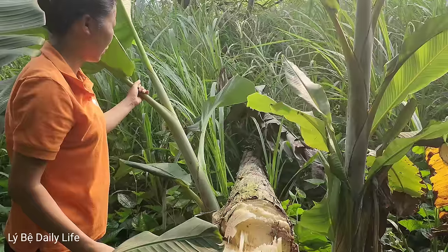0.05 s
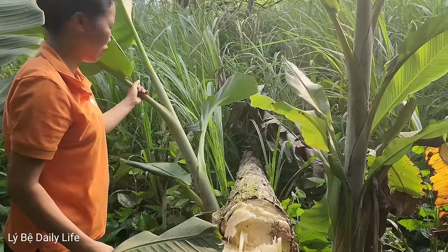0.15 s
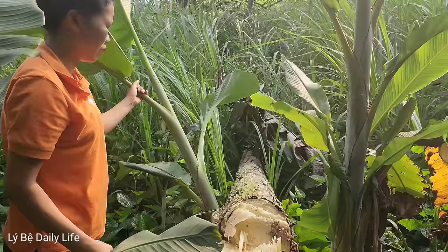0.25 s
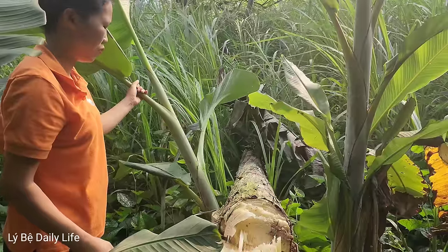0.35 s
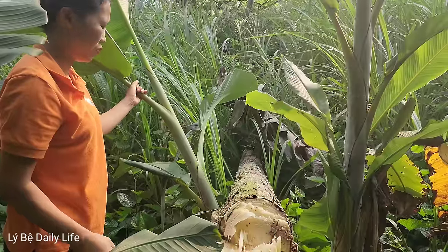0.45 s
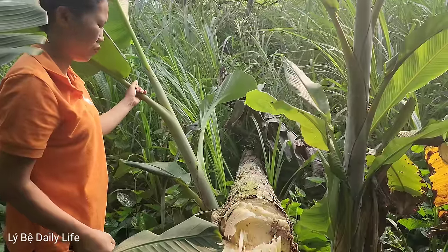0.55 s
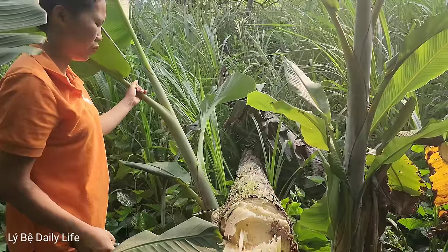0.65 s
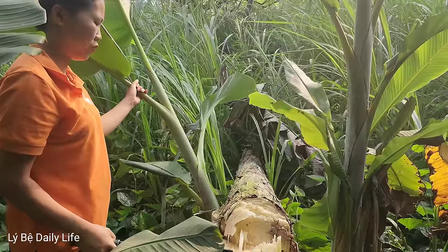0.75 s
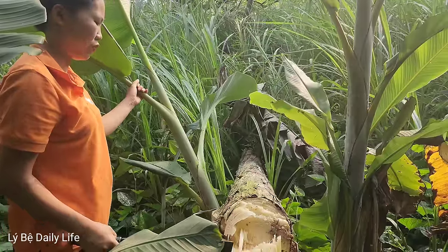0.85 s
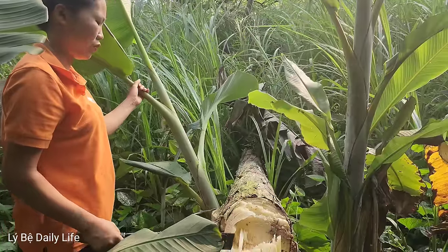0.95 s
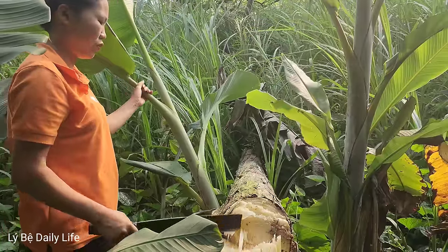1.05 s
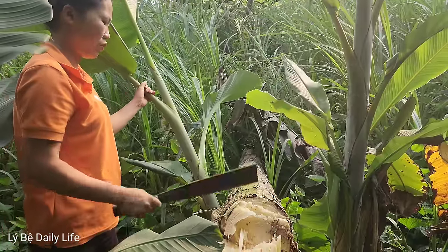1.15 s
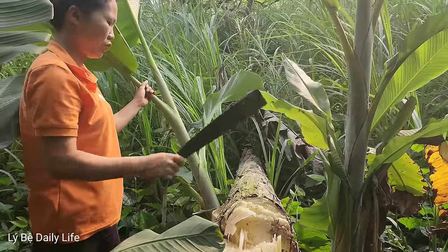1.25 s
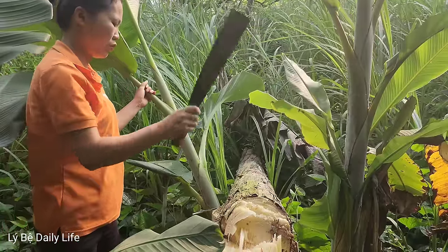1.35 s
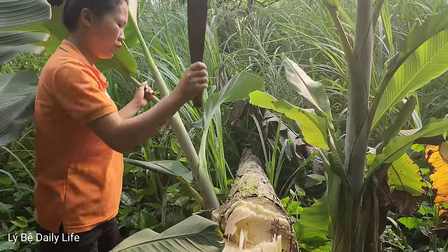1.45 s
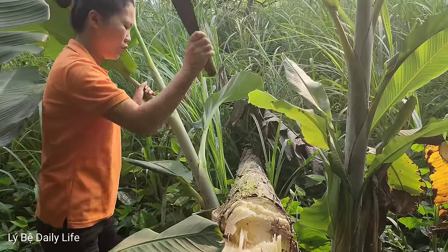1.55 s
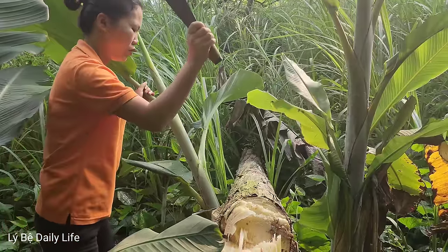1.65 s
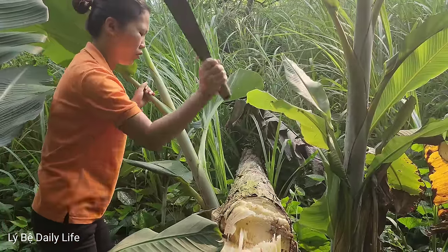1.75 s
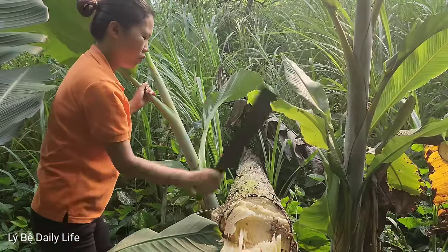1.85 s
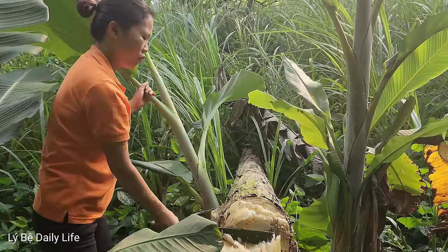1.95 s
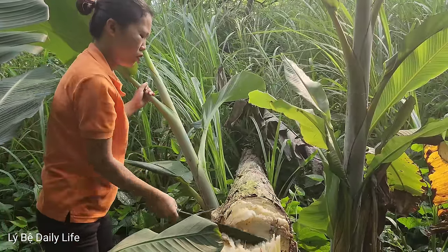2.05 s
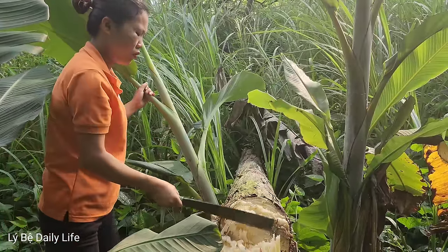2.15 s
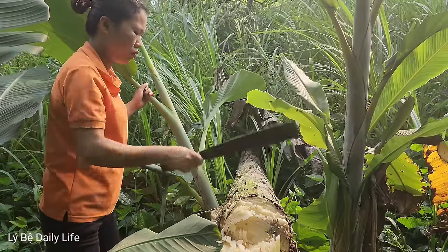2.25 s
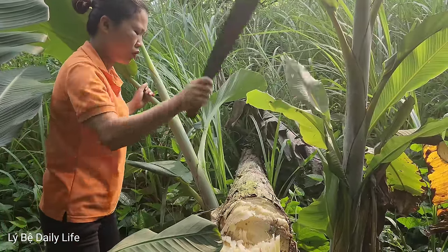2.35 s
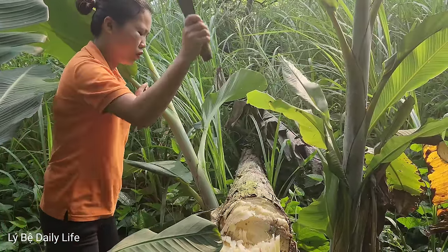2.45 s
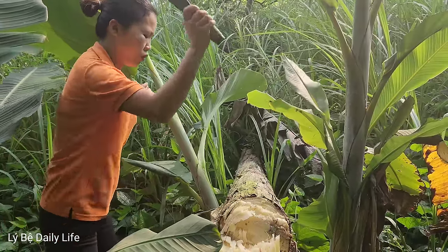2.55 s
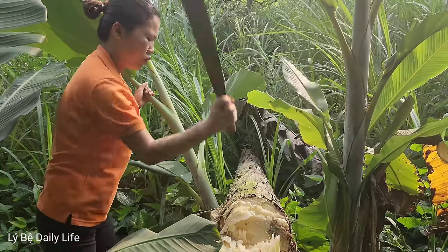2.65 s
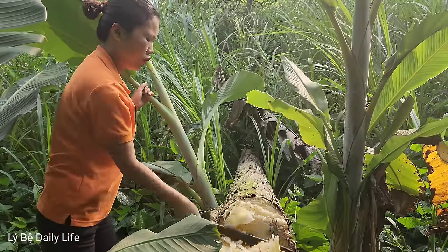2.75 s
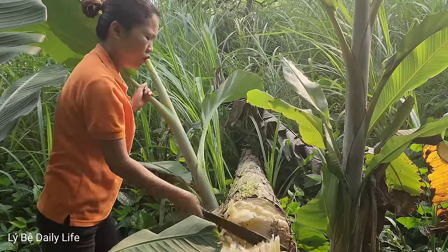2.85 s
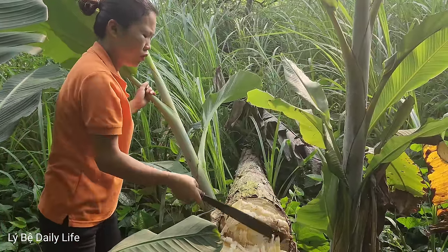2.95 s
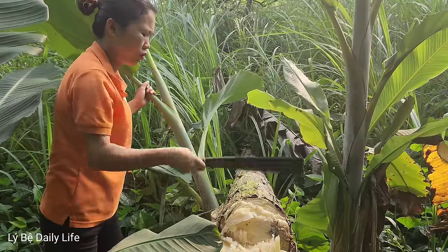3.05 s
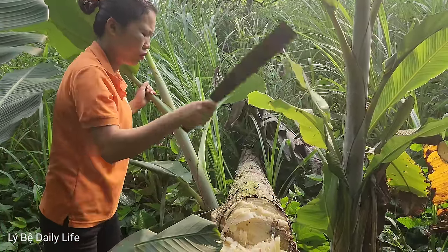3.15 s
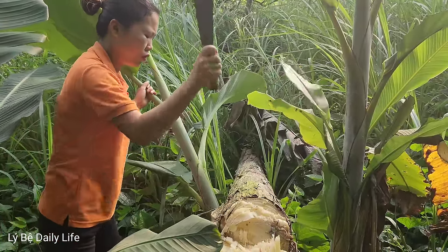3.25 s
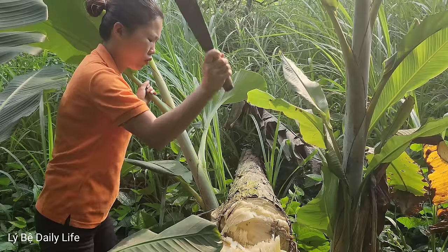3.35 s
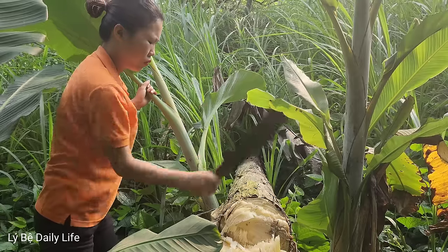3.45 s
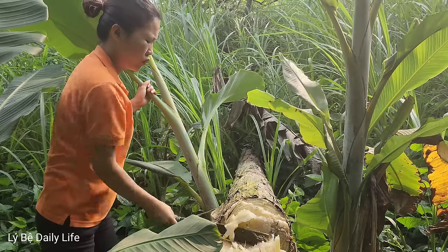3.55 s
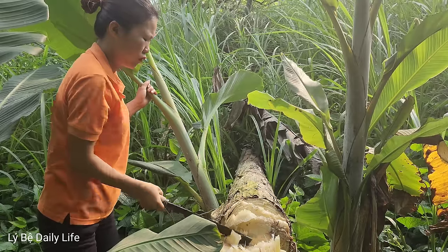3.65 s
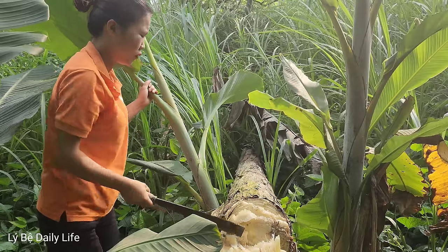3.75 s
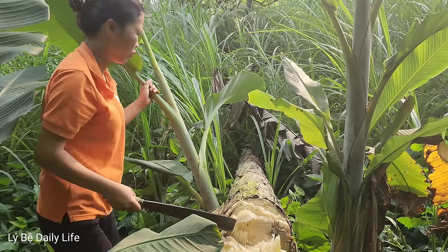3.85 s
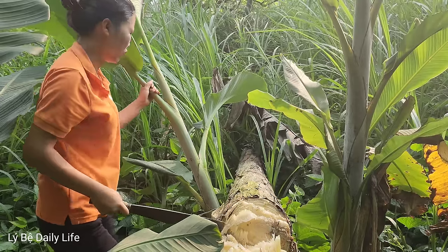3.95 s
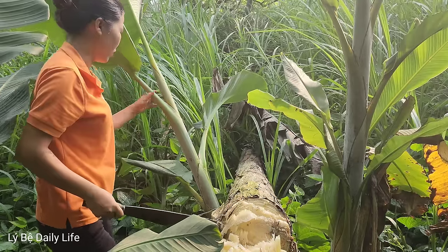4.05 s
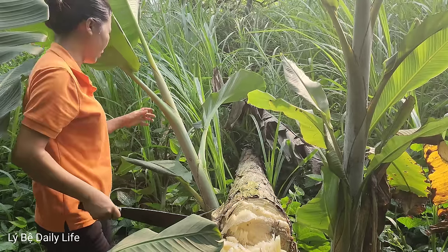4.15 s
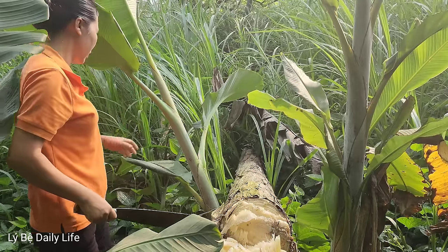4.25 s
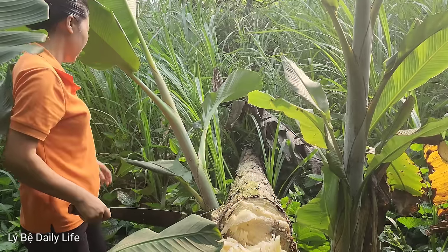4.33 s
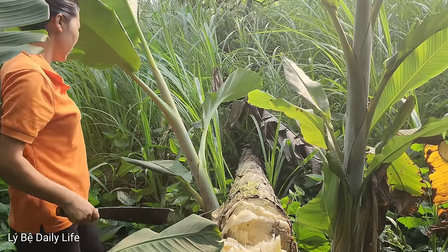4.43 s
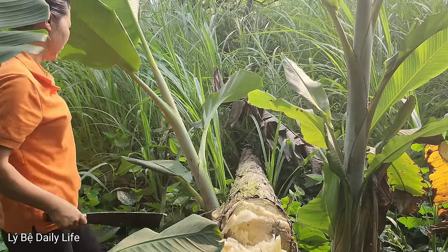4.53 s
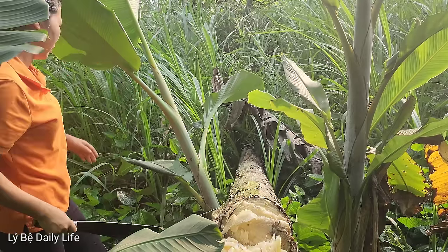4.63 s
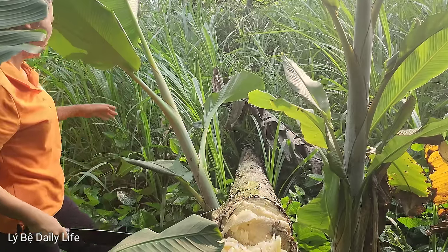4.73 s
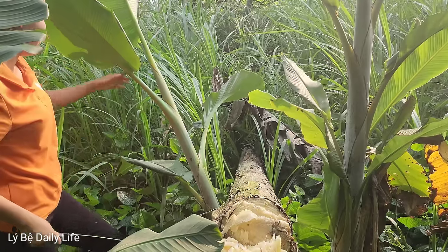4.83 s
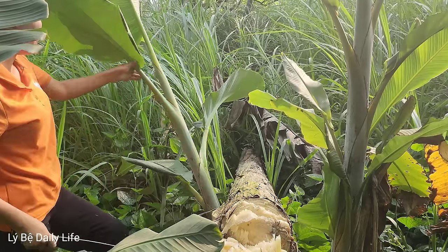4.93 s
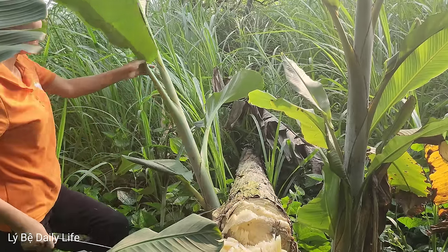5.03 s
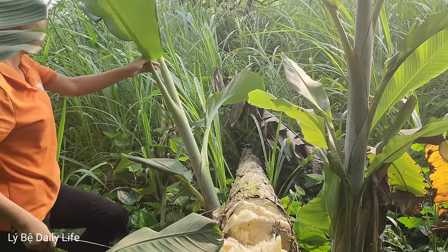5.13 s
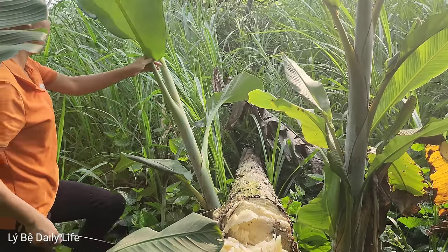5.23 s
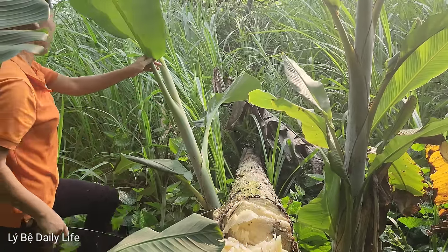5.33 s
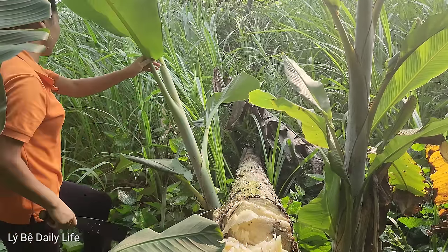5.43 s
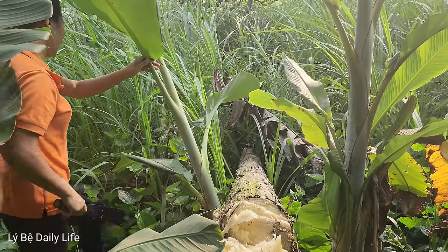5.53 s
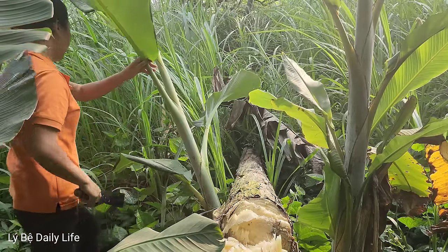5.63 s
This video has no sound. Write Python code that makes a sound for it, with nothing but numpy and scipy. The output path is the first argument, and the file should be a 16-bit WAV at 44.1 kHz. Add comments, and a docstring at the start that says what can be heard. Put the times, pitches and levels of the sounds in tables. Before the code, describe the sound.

Leaves rustle in an open garden while a bird repeats one high, arched whistle and insects whine faintly. Close to the stereo microphones, a machete chops three times into a felled banana trunk, each blow a wet, tearing crunch with a hollow thud, and is tugged free in between. Then soft footsteps move through the undergrowth, a little to the left.

```python
"""Leaves rustle in an open garden, a bird repeats one arched whistle and insects whine faintly.
Close to the stereo microphones, a machete chops three times into a felled banana trunk and is tugged free.
Wet fibres tear as the blade sinks in, the trunk thuds and rocks, and the foliage scatters each blow.
Then the worker steps away through the undergrowth, a little to the left."""
import sys
import numpy as np
from scipy import signal
from scipy.fft import rfft, irfft
from scipy.io import wavfile
from scipy.ndimage import uniform_filter1d

SR = 44100
rng = np.random.default_rng(int(sys.argv[2]) if len(sys.argv) > 2 else 0)


def int16_out(signal):
    """Quantize to a 16-bit WAV file."""
    q = np.round(np.clip(np.atleast_2d(signal).T, -1, 1) * 32767)
    wavfile.write(sys.argv[1], SR, q.astype(np.int16))


N = 250929
TIME = np.arange(N) / SR

# steady wash of the open garden: f/Hz, relative level/dB
AIR_SPECTRUM = [(20, 5.5), (50, 12), (100, 1.5), (220, -5.5), (380, -2), (480, -11.5), (650, 4),
                (1100, -4.5), (2300, -6.5), (3300, -1.5), (4500, 1.5), (6000, -8.5), (8000, -5.5),
                (10000, -14.5), (15500, -17.5)]
# likeness of the two microphones for air, plants and feet: f/Hz, correlation
AMBIENT_LIKENESS = [(50, 0.81), (400, 0.81), (800, 0.35), (1600, 0.051), (3500, 0.22), (15000, 0.022)]
# the same for the blade, cracking leaves and echoes: f/Hz, correlation
NEAR_LIKENESS = [(50, 0.75), (400, 0.93), (800, 0.83), (1600, 0.094), (3600, 0.39), (7000, .12),
                 (15000, 0.046)]
# treble balance, leaning right: f/Hz, left minus right/dB
MIC_BALANCE = [(600, 0), (1200, -1.8), (15000, -2.2)]
# faint, far-off hoots: t/s, length/s, starting f/Hz, ending f/Hz, level/dB
HOOTS = [(0.883, 0.176, 396, 337, -72.5), (1.127, 0.15, 1050, 1095, -70)]
# course of the insect whine: t/s, base f/Hz, level/dB, pitch blur/Hz
WHINE_COURSE = [(0, 8150, -71, 12), (0.998, 8220, -71, 14), (1.9, 8360, -69.5, 40), (2.9, 8070, -68.5, 100),
                (3.6, 7720, -73, 90), (4.4, 7460, -67.5, 70), (5.69, 7390, -74, 80)]
# lines of the whine: multiple of the base f, relative level/dB
WHINE_LINES = [(0.929, -4), (0.997, -1), (1.071, -5), (1.089, -10.5), (1.135, -9)]
# arch of one whistle: t/s from its top, f/Hz, relative level/dB
WHISTLE_ARCH = [(-.165, 4020, -13), (-.115, 3510, -12), (-.06, 3820, -3.5), (-.05, 4200, -1.5),
                (-.005, 4430, -.5), (.026, 4270, -4.5), (.052, 3780, -5), (.135, 3150, -6),
                (.225, 2690, -13)]
# the bird's calls: t/s at the top, level/dB, pitch factor, length factor
BIRD_CALLS = [(0.529, -46, 0.99, 1.12), (1.145, -43.5, 1.01, 1.02), (1.791, -44, 1.016, 0.96),
              (2.875, -48, 1, 1), (3.474, -46, 0.98, 1.07), (4.175, -47, .985, 1.02),
              (4.88, -45.5, 0.98, 1.04), (5.556, -43, 0.99, 1.12)]
# decay of the whistle in the thicket: f/Hz, t60/s
THICKET_DECAY = [(2800, .42), (4400, .55)]
# decay of the blows across the garden: f/Hz, t60/s
GARDEN_DECAY = [(60, 0.38), (250, 0.44), (800, 0.23), (3000, 0.44), (8000, 0.55), (15000, 0.26)]

# stems and cloth rubbing: f/Hz, relative level/dB
STEM_SPECTRUM = [(100, -21), (400, -16), (600, 0), (850, 5), (1100, -1), (1500, 2.5), (2400, -4.5),
                 (5000, -21), (16000, -44)]
# leaf hiss: f/Hz, relative level/dB
LEAF_SPECTRUM = [(300, -24.5), (1500, -1), (3000, 0), (5000, -0.5), (7000, 0), (10000, -2), (13000, -2),
                 (15500, -11.5), (17000, -22.5)]
# plants brushed or shaken: t/s at the peak, rise/s, fall/s, stem level/dB, leaf level/dB
BRUSHES = [(.07, 0.67, 0.44, -60.5, -55), (.29, 0.092, 0.097, -57, -60), (1.06, 0.089, 0.31, -65.5, -63.5),
           (1.259, .02, 0.078, -66, -62), (1.55, 0.16, .2, -73.5, -67), (2.09, 0.029, 0.057, -63.5, -62.5),
           (2.93, 0.037, 0.083, -55, -65.5), (3.76, .06, 0.2, -63.5, -58.5), (3.92, .03, 0.12, -60.5, -58),
           (4.178, 0.024, .12, -54.5, -52), (4.991, 0.19, 0.039, -57.5, -52.5),
           (5.22, 0.23, 0.044, -62.5, -62), (5.38, .01, 0.18, -55, -57.5), (5.62, 0.26, .22, -55.5, -52)]
# dry leaves cracking: t/s, level/dB
LEAF_CRACKS = [(4.163, -51), (4.995, -52)]
# small knocks among the plants: t/s, level/dB, f/Hz, width/Hz, fall/s
PLANT_KNOCKS = [(.140, -49.5, 776, 218, 0.011), (.960, -59, 1000, 250, 0.0089),
                (2.186, -59.5, 820, 392, 0.011), (2.931, -47.5, 190.6, 30.3, 0.024),
                (3.149, -45.5, 270, 161, 0.016), (3.229, -59.5, 327, 217, .015),
                (4.072, -58, 226, 40.4, 0.011), (4.182, -54.5, 500, 900, 0.007),
                (4.895, -58, 138, 88, 0.042)]
# undergrowth under a foot: f/Hz, relative level/dB
TREAD_SPECTRUM = [(30, 1), (70, -6), (170, 5.5), (270, -2), (380, 6), (520, -12.5), (900, -29), (4000, -62)]
# footfalls: t/s at full weight, level/dB
STEPS = [(.27, -72), (4.184, -56), (4.971, -58.5), (5.29, -60), (5.42, -60), (5.56, -59.5), (5.67, -63)]

# modes of the trunk: f/Hz, relative level/dB, t60/s
TRUNK_MODES = [(56.4, -15, 0.22), (81.4, -15, 0.26), (108, -3, 0.084), (138, -5.5, 0.091),
               (210.1, -2.5, 0.056), (253, 2, 0.043), (305, -5, 0.046), (383, -1.5, 0.057),
               (660, -5.5, 0.085)]
# pushes on the trunk: t/s, level/dB, push length/s, factor on the mode pitches
THUDS = [(1.9553, -22, 0.0013, 0.94), (2.007, -43.5, 0.00069, 1.16), (2.3200, -73, 0.00053, 1.04),
         (2.7936, -19, 0.00091, 0.97), (3.1415, -46.5, 0.00054, 1.04), (3.5437, -15, 0.0011, 1.05),
         (4.1760, -39, 0.0019, 1.1)]
# the trunk rocking on the ground: t/s after the push, relative level/dB, push length/s
ROCKING = [(.012, -4, .004), (.052, -3.5, 0.0067)]
# modes of an air chamber in the trunk: multiple of its pitch, relative level/dB, t60/s
CHAMBER_MODES = [(1.0, 1.5, .024), (1.45, -9, .026), (2.05, -7, .024), (2.9, -15, 0.016)]
# modes of the steel blade: f/Hz, relative level/dB, t60/s
BLADE_MODES = [(3365, -8, .08), (7050, -4, .1), (8183, -3, .17), (9388, 2.5, .2), (12010, 3, .13)]
# blade sliding on fibre: t/s, rise/s, fall/s, hiss level/dB, ring level/dB
SCRAPES = [(2.938, 0.0058, 0.033, -48, -52)]
# wet pulp giving way: f/Hz, relative level/dB
PULP_SPECTRUM = [(60, -25.5), (150, -8), (300, -1), (500, -7.5), (750, 0.5), (1050, -5.5), (1600, -2),
                 (2200, -2.5), (3000, -22.5), (6000, -25.5), (16000, -56.5)]
# fibres snapping: f/Hz, relative level/dB
FIBRE_SPECTRUM = [(200, -29), (1000, -3), (2400, -0.5), (3600, -0.5), (5500, -0.5), (7500, -4.5),
                  (10000, -4.5), (13000, -4.5), (15000, -8), (17000, -20)]
# blade levered and tugged free: t/s, crunch level/dB, fibre level/dB, chamber f/Hz, chamber level/dB
TUGS = [(2.0048, -34, -39, 648, -32), (2.3205, -43.5, -41.5, 920, -60), (2.903, -47, -64, 710, -42),
        (3.1440, -33.5, -38, 980, -34), (3.6090, -41.5, -41, 900, -47.5), (3.6295, -42.5, -44.5, 705, -42)]
# chops: t/s as the edge enters, sinking time/s, slice level/dB, fibre level/dB, final crunch level/dB,
# treble tilt of that crunch/dB per octave, chamber f/Hz, chamber level/dB
CHOPS = [(1.9420, .0100, -22, -18.5, -13.5, -0.5, 615, -15.5),
         (2.7874, 0.0029, -13.5, -17, -14, -3, 648, -9.5), (3.5369, .0032, -23, -21, -15, -4.5, 726, -5.5)]


def gain_of(db):
    """Decibels to amplitude."""
    return 10 ** (np.asarray(db) / 20)


def unit_rms(x):
    """Scales to unit rms."""
    return x / np.sqrt(np.mean(x ** 2) + 1e-20)


def read(points, hz):
    """Reads a table on a log-frequency axis."""
    f, value = np.transpose(points)
    return np.interp(np.log(hz + 1), np.log(f + 1), value)


def add(mix, s, sound):
    """Mixes a sound in at s seconds."""
    part = mix[..., max(round(s * SR), 0):][..., :sound.shape[-1]]
    part += sound[..., :part.shape[-1]]


def colour(x, spectrum, likeness):
    """Turns two unrelated signals into a stereo pair of a given spectrum, at unit rms."""
    hz = np.fft.rfftfreq(x.shape[1], 1 / SR)
    a, b = rfft(x)
    same = np.clip(read(likeness, hz), -1, 1)
    mid, side = a * np.sqrt(1 + same), b * np.sqrt(1 - same)
    pair = np.array([mid + side, mid - side])
    return unit_rms(irfft(pair * gain_of(read(spectrum, hz)), x.shape[1]))


def whiten(x, bins=33):
    """Evens out the broad colour of a burst, keeping its fine grain."""
    spectrum = rfft(x)
    power = np.abs(uniform_filter1d(np.abs(spectrum) ** 2, bins))
    return irfft(spectrum / np.sqrt(power + 1e-20), x.shape[-1])


def drift(size, hz):
    """Slow random wander of unit rms."""
    slow = np.exp(-(np.fft.rfftfreq(size, 1 / SR) / hz) ** 2)
    return unit_rms(irfft(rfft(rng.standard_normal(size)) * slow, size))


def crackle(size, per_s, spread_db):
    """Two trains of tiny snaps of uneven strength."""
    strength = gain_of(spread_db * np.minimum(rng.exponential(1, (2, size)), 4))
    return strength * rng.choice([-1, 1], (2, size)) * (rng.random((2, size)) < per_s / SR)


def noise_band(size, hz, width_hz):
    """Noise through two damped resonances at one pitch, the second twice as wide."""
    x = rng.standard_normal(size)
    for width in (width_hz, 2 * width_hz):
        r = np.exp(-np.pi * width / SR)
        x = signal.lfilter([1, 0, -1], [1, -2 * r * np.cos(2 * np.pi * hz / SR), r * r], x)
    return x


def ring(modes, tune=1):
    """Impulse response of a table of modes."""
    t = TIME[:SR // 2]
    return sum(gain_of(db - 60 * t / t60) * np.cos(2 * np.pi * hz * tune * t) for hz, db, t60 in modes)


def swell(rise_s, fall_s, hold_s=0, size=8192):
    """Lead time and shape of a short envelope that grows, holds and dies away."""
    lead = TIME[size // 4]
    t = TIME[:size] - lead
    return lead, np.exp(np.minimum(np.minimum(t / rise_s, (hold_s - t) / fall_s), 0))


def surge(s, rise_s, fall_s):
    """A scene-long envelope that peaks at s seconds."""
    return np.exp(np.minimum((TIME - s) / rise_s, (s - TIME) / fall_s))


def sized(x, shape):
    """Gives a burst the energy of its envelope."""
    return unit_rms(x) * np.sqrt(np.mean(shape ** 2))


def from_left(x, louder_db=3, sooner_s=.00018):
    """A sound on the worker's side reaches the left microphone sooner and louder."""
    late_right = np.roll(x[1], round(sooner_s * SR))
    return np.array([gain_of(louder_db / 2) * x[0], gain_of(-louder_db / 2) * late_right])


def scatter(x, t60s, onset_s, taps_per_s=4000):
    """Echoes from leaves and stems: dense taps, each band dying at its own speed."""
    taps = rng.standard_normal((2, SR)) * (rng.random((2, SR)) < taps_per_s / SR)
    taps = colour(taps, [(20, 0.004), (20000, 0.013)], NEAR_LIKENESS)
    hz, t, bands = signal.stft(taps, SR, nperseg=256)
    decay = gain_of(-60 * t / read(t60s, hz)[:, None])
    tail = signal.istft(bands * decay, SR, nperseg=256)[1][:, :SR]
    tail *= 1 - np.exp(-(TIME[:SR] / onset_s) ** 2)
    return signal.fftconvolve(x[None], tail / np.linalg.norm(tail[0]), axes=1)[:, :N]


def air(level_db=-62.5, swell_db=1.27):
    """The wash of the open garden, all around the microphones."""
    wash = colour(rng.standard_normal((2, N)), AIR_SPECTRUM, AMBIENT_LIKENESS)
    return wash * gain_of(level_db + swell_db * drift(N, hz=2.8))


def hoots():
    """Soft gliding tones from far away."""
    out = np.zeros(N)
    for s, length, start_hz, end_hz, db in HOOTS:
        hz = np.linspace(start_hz, end_hz, round(length * SR))
        tone = np.sqrt(2) * np.sin(2 * np.pi * np.cumsum(hz) / SR)
        add(out, s, gain_of(db) * np.hanning(len(hz)) * tone)
    return out


def insects(flicker_db=0.5):
    """Thin high lines on both sides glide up, then sink and blur into a buzz."""
    s, *columns = np.transpose(WHINE_COURSE)
    hz, db, blur = (np.interp(TIME, s, column) for column in columns)
    out = np.zeros((2, N))
    for ratio, line_db in WHINE_LINES:
        for side in range(2):
            turns = np.cumsum(ratio * hz + blur * drift(N, hz=150)) / SR
            loudness = gain_of(db + line_db + flicker_db * drift(N, hz=5.2))
            out[side] += loudness * np.sin(2 * np.pi * turns)
    return out


def bird(flutter_db=2.5, direct_db=-5, echo_db=-4.0):
    """A near-sine whistle dips, arches and slides down, blurred by the thicket."""
    song = np.zeros(N)
    offset, pitch, level = np.transpose(WHISTLE_ARCH)
    for s, db, tune, stretch in BIRD_CALLS:
        t = np.arange(offset[0], offset[-1], 1 / SR / stretch)
        waver = 1 + .012 * drift(len(t), hz=200)
        hz = tune * np.interp(t, offset, pitch) * waver
        tone = np.sqrt(2) * np.sin(2 * np.pi * np.cumsum(hz) / SR)
        loudness = gain_of(db + np.interp(t, offset, level) + flutter_db * drift(len(t), hz=96))
        add(song, s + stretch * offset[0], loudness * signal.windows.tukey(len(t), .08) * tone)
    direct = np.array([np.roll(song, 4), song])  # reaches the right microphone first
    echoes = np.array([scatter(song, THICKET_DECAY, onset_s=0.0045)[side] for side in range(2)])
    return gain_of(direct_db) * direct + gain_of(echo_db) * echoes


def rustle(grain_db=1.5, flicker_db=2.5):
    """Stems, cloth and leaves rub in clumps of small grains; now and then a dry leaf cracks."""
    stem_gain, leaf_gain = np.zeros((2, N))
    for s, rise, fall, stem_db, leaf_db in BRUSHES:
        shape = surge(s, rise, fall)
        stem_gain = np.hypot(stem_gain, gain_of(stem_db) * shape)
        leaf_gain = np.hypot(leaf_gain, gain_of(leaf_db) * shape)
    clumps_db = flicker_db * drift(N, hz=45)
    stems = colour(crackle(N, 2600, grain_db), STEM_SPECTRUM, AMBIENT_LIKENESS)
    stems *= stem_gain * gain_of(clumps_db)
    leaves = colour(crackle(N, 14000, grain_db), LEAF_SPECTRUM, AMBIENT_LIKENESS)
    leaves *= leaf_gain * gain_of(.5 * clumps_db)
    for s, db in LEAF_CRACKS:
        add(leaves, *tear(s, swell(rise_s=.003, fall_s=0.011), db))
    return from_left(stems) + leaves


def plant_knocks(rise_s=0.0048):
    """Small knocks among the plants, each a burst in one band of noise."""
    out = np.zeros(N)
    for s, db, hz, width, fall in PLANT_KNOCKS:
        lead, shape = swell(rise_s, fall)
        burst = noise_band(len(shape), hz, width) * shape
        add(out, s - lead, gain_of(db) * sized(burst, shape))
    return out


def steps(rise_s=0.041, fall_s=0.099):
    """Feet press the soft undergrowth, left of the microphones."""
    weight = np.sqrt(sum((gain_of(db) * surge(s, rise_s, fall_s)) ** 2 for s, db in STEPS))
    grains = crackle(N, per_s=760, spread_db=3.0)
    return from_left(colour(grains, TREAD_SPECTRUM, AMBIENT_LIKENESS)) * weight


def swings(level_db=-60.5):
    """Air pushed ahead of the blade makes a low whoosh, greatest as the edge enters."""
    speed = sum(surge(s, rise_s=0.012, fall_s=.01) for s, *_ in CHOPS)
    return gain_of(level_db) * unit_rms(noise_band(N, hz=200, width_hz=250)) * speed


def scrapes():
    """Fibres rub the flat of the blade, and the steel rings faintly as it slips."""
    out = np.zeros((2, N))
    steel = ring(BLADE_MODES)
    for s, rise, fall, hiss_db, ring_db in SCRAPES:
        add(out, *tear(s, swell(rise, fall), hiss_db, snaps_per_s=6000))
        onset = 1 - np.exp(-TIME[:len(steel)] / rise)
        add(out, s, gain_of(ring_db) * steel * onset)
    return out


def thuds():
    """The stopping blade pushes the trunk, which then rocks back softly on the ground."""
    out, t = np.zeros(N), TIME[:SR // 8]
    for s, db, length, tune in THUDS:
        force = np.zeros(len(t))
        for delay, push_db, width in [(length, 0, length), *ROCKING]:
            push = np.exp(-(2 * (t - delay) / width) ** 2)
            force += gain_of(push_db) * push / push.sum()
        add(out, s, -gain_of(db) * signal.fftconvolve(force, ring(TRUNK_MODES, tune)))
    return out


def chambers(opening_s=0.00063, entry_ratio=1.3, entry_db=-10):
    """Each bite opens an air chamber in the trunk: a hollow knock, higher while the cut is shallow."""
    out = np.zeros(N)
    opening = 1 - np.exp(-TIME[:SR // 2] / opening_s)
    knocks = [(s, hz, db) for s, *_, hz, db in TUGS]
    for s, sink, *_, hz, db in CHOPS:
        knocks += [(s, entry_ratio * hz, db + entry_db), (s + sink, hz, db)]
    for s, hz, db in knocks:
        add(out, s - 2 * opening_s, gain_of(db) * opening * ring(CHAMBER_MODES, hz))
    return out


def tear(s, envelope, db, snaps_per_s=11000):
    """Fibres snap in a dense hiss; gives the start time and the sound."""
    lead, shape = envelope
    grains = crackle(len(shape), snaps_per_s, spread_db=4.0) * shape
    return s - lead, gain_of(db) * sized(colour(grains, FIBRE_SPECTRUM, NEAR_LIKENESS), shape)


def bite(s, envelope, crunch_db, fibre_db, treble_tilt, bass_tilt=0, pivot_hz=750):
    """The blade crushes pulp and snaps fibres; gives the start time and the sound."""
    lead, shape = envelope
    # softer pulp sounds duller: tilts are in dB per octave away from the pivot
    spectrum = [(hz, db + (treble_tilt if hz > pivot_hz else bass_tilt) * abs(np.log2(hz / pivot_hz)))
                for hz, db in PULP_SPECTRUM]
    grains = whiten(crackle(len(shape), per_s=11000, spread_db=2.0) * shape)
    contact = np.minimum(10 * np.maximum.accumulate(shape), 1)  # silent until the edge touches
    pulp = sized(colour(grains, spectrum, NEAR_LIKENESS) * contact, shape)
    _, fibres = tear(s, envelope, fibre_db)
    return s - lead, gain_of(crunch_db) * pulp + fibres


def cuts(stop_rise_s=0.00098):
    """Close up, each chop slices, tears and ends in a crunch; each tug is one softer bite."""
    out = np.zeros((2, N))
    for s, sink, slice_db, fibre_db, stop_db, stop_tilt, _, _ in CHOPS:
        slicing = swell(rise_s=0.0023, fall_s=0.0023, hold_s=sink)
        add(out, *bite(s, slicing, slice_db, fibre_db=slice_db - 6, treble_tilt=-0.6, bass_tilt=-5))
        tearing = swell(rise_s=0.59 * sink / 2, fall_s=0.0055, hold_s=sink / 2)
        add(out, *tear(s + sink / 2, tearing, fibre_db))  # hardest near the stop
        stopping = swell(stop_rise_s, fall_s=.0027)  # packed pulp halts the blade
        add(out, *bite(s + sink, stopping, stop_db, fibre_db=-24, treble_tilt=stop_tilt))
        settling = swell(stop_rise_s, fall_s=0.016)  # torn fibres crackle on
        add(out, *tear(s + sink, settling, db=-32))
    for s, crunch_db, fibre_db, _, _ in TUGS:
        add(out, *bite(s, swell(rise_s=.0008, fall_s=.0085), crunch_db, fibre_db, treble_tilt=-0.14))
    return out


def scene(near_db=-11, near_t60=0.099, far_db=-21, trunk_echo_db=-8):
    """Close blows with their near and far echoes, over the life of the garden."""
    blade = cuts() + scrapes()
    trunk = thuds() + chambers()
    reflected = blade[0] + gain_of(trunk_echo_db) * trunk  # leaves throw back little of the low knock
    near = gain_of(near_db) * scatter(reflected, [(100, near_t60), (15000, near_t60)], onset_s=.005)
    far = gain_of(far_db) * scatter(reflected, GARDEN_DECAY, onset_s=0.011)
    blows = blade + trunk + near + far
    return blows + plant_knocks() + bird() + hoots() + insects() + swings() + steps() + rustle() + air()


def record(dry, low_cut_hz=50, high_cut_hz=15750):
    """The microphones lean right in the treble and shed the deep bass and the very top."""
    lean_db = read(MIC_BALANCE, np.fft.rfftfreq(N, 1 / SR))
    heard = irfft(rfft(dry) * gain_of([lean_db / 2, -lean_db / 2]), N)
    low_cut = signal.butter(2, low_cut_hz, "highpass", fs=SR, output="sos")
    high_cut = signal.firwin(401, high_cut_hz, window=("kaiser", 8), fs=SR)
    return signal.oaconvolve(signal.sosfilt(low_cut, heard), high_cut[None], "same")


dry = scene()
out = record(dry)
int16_out(out)
```